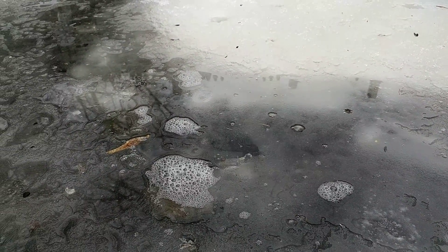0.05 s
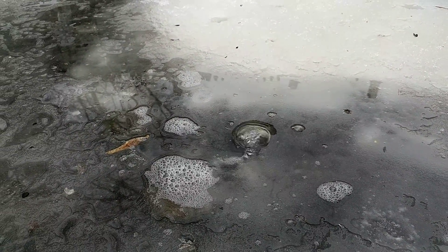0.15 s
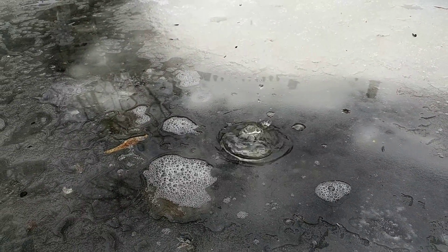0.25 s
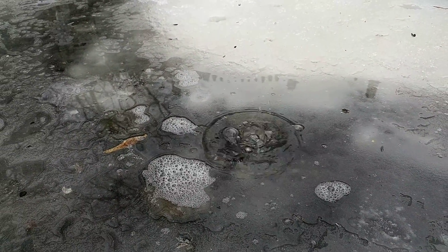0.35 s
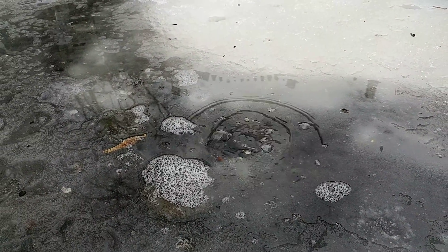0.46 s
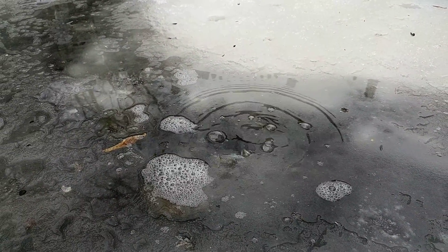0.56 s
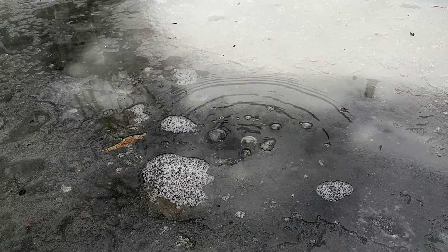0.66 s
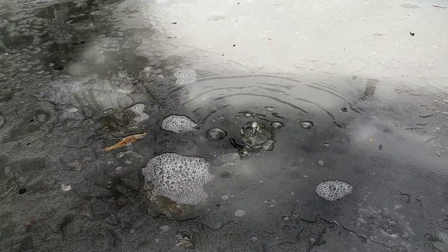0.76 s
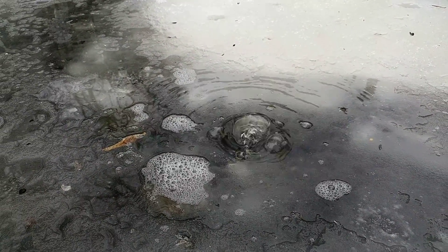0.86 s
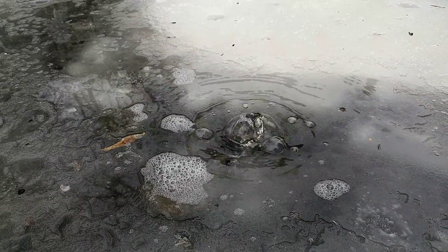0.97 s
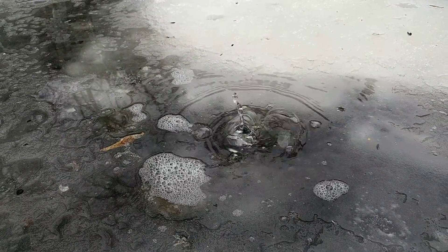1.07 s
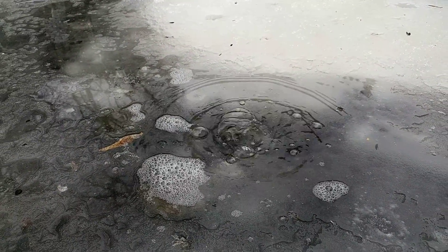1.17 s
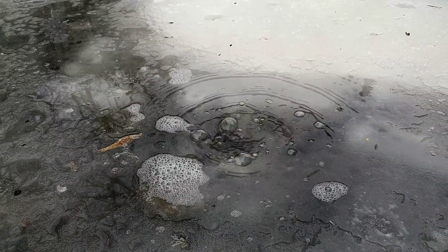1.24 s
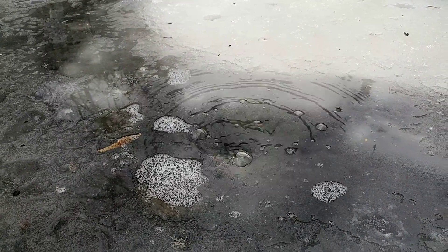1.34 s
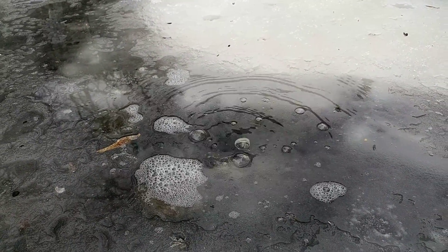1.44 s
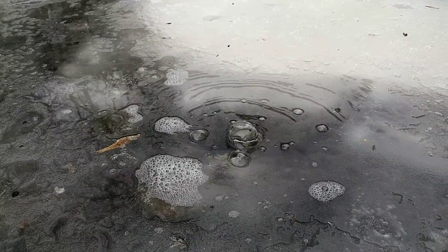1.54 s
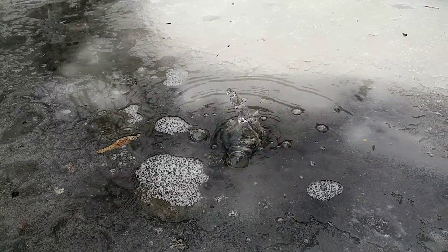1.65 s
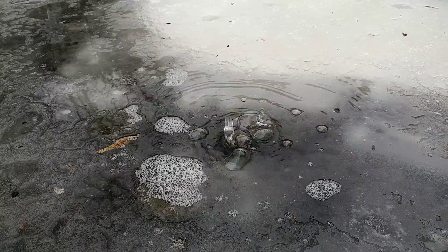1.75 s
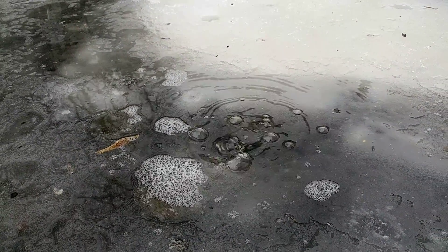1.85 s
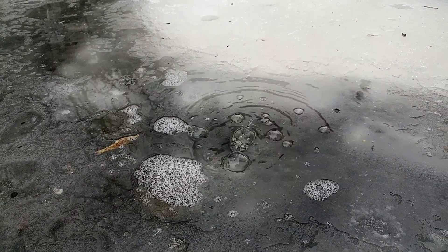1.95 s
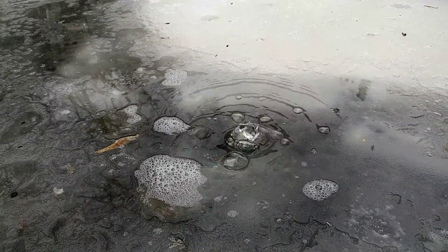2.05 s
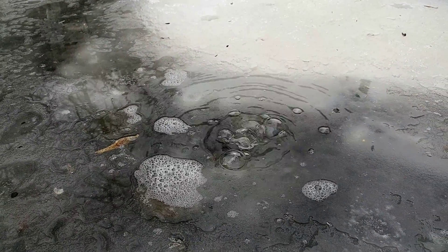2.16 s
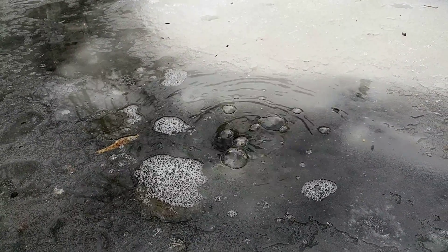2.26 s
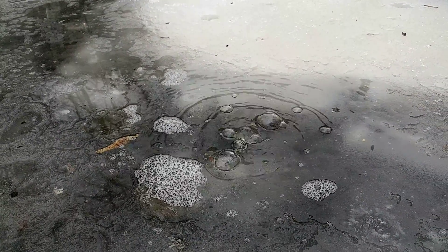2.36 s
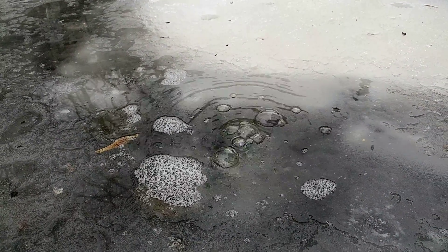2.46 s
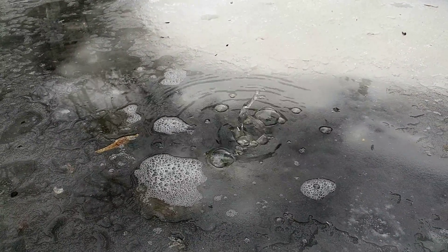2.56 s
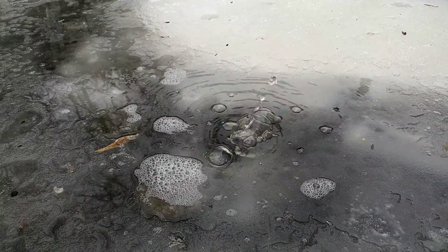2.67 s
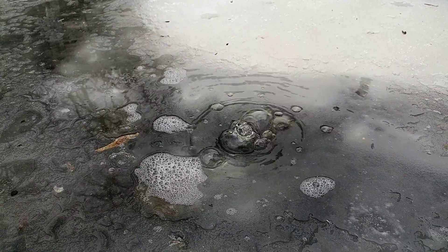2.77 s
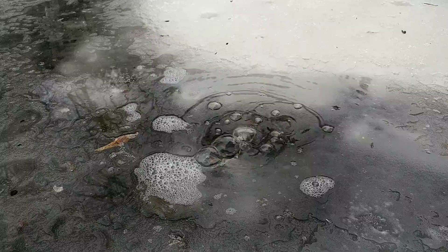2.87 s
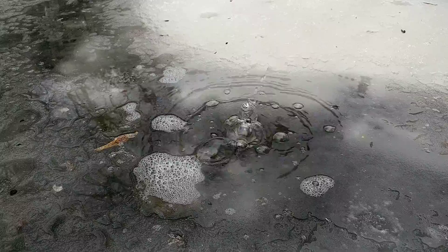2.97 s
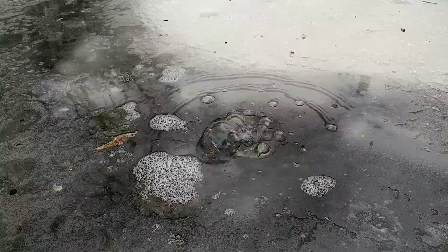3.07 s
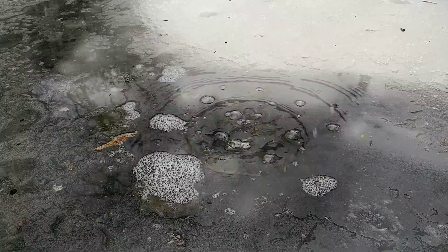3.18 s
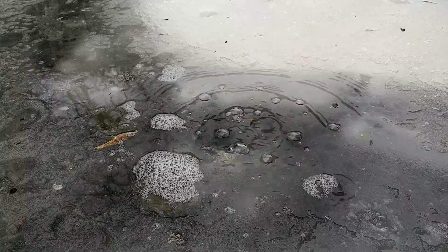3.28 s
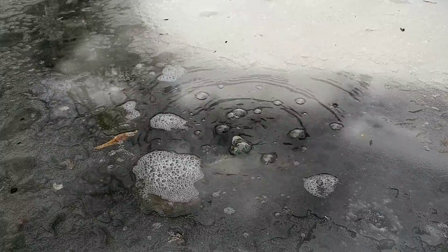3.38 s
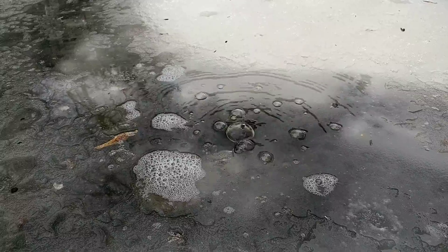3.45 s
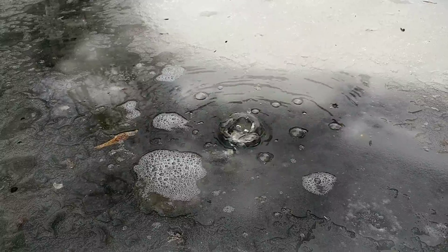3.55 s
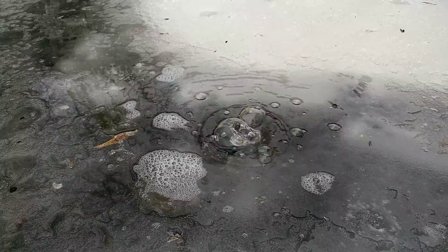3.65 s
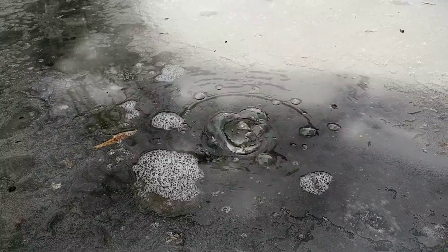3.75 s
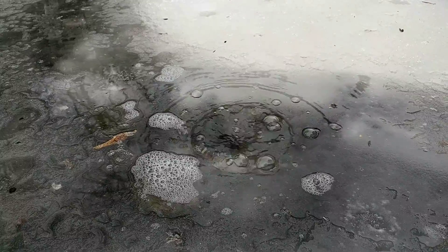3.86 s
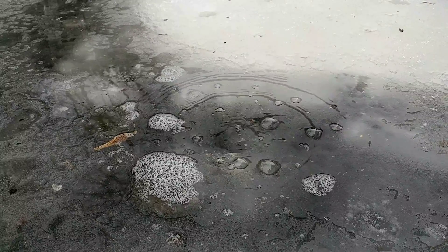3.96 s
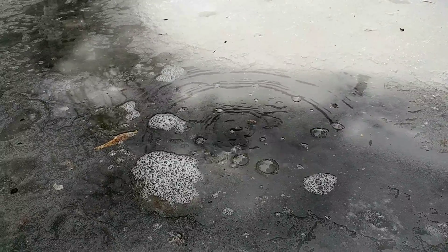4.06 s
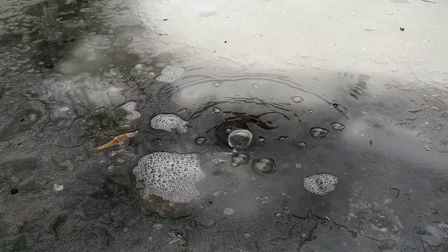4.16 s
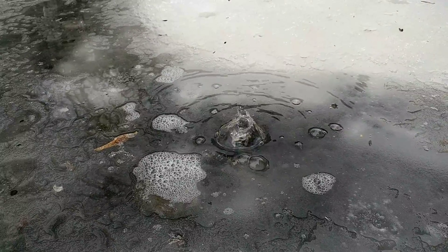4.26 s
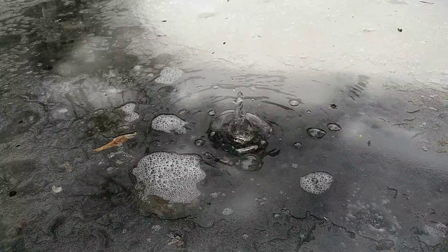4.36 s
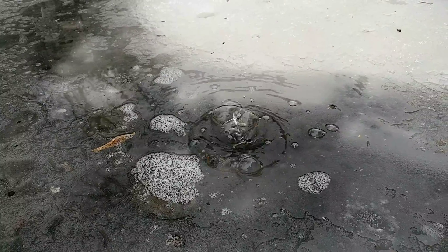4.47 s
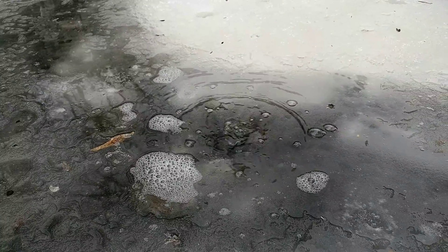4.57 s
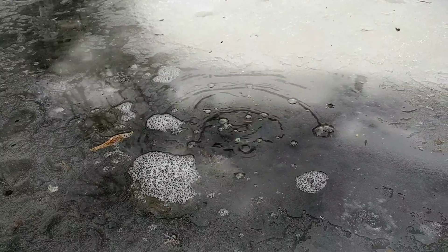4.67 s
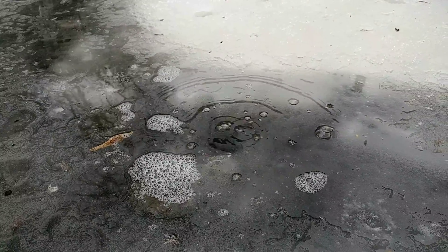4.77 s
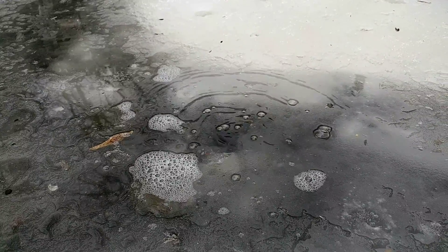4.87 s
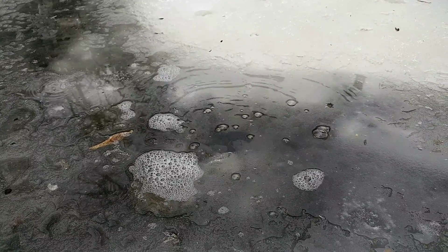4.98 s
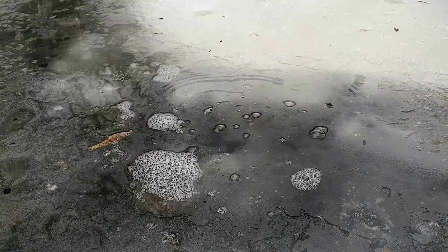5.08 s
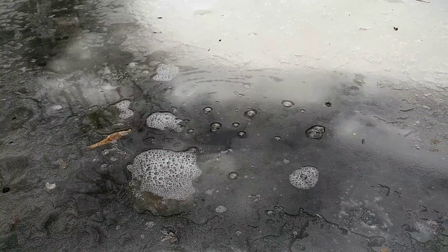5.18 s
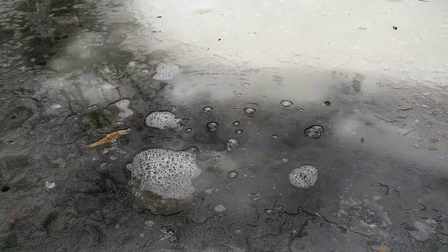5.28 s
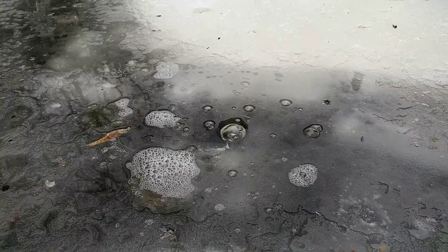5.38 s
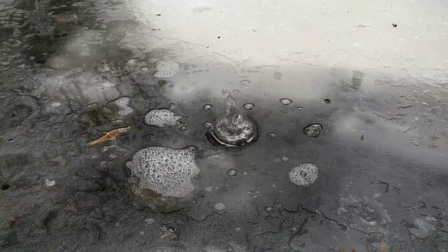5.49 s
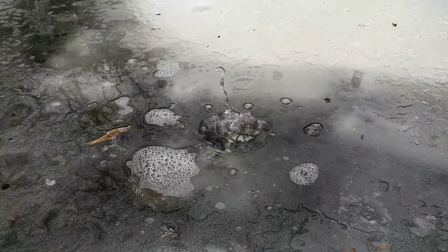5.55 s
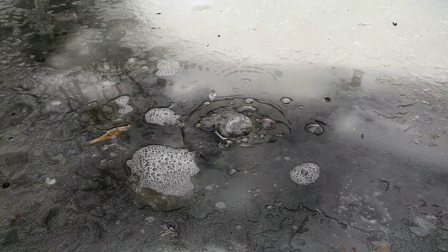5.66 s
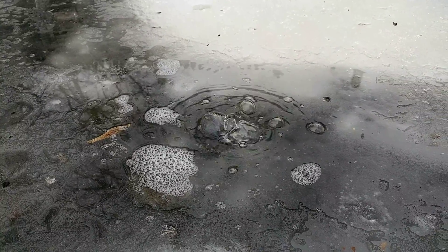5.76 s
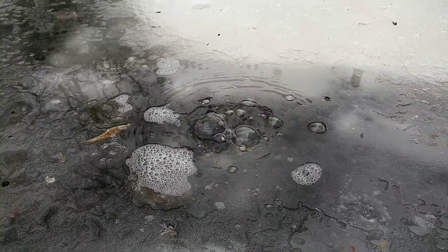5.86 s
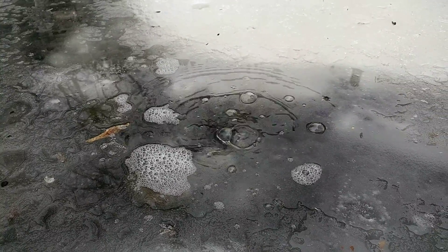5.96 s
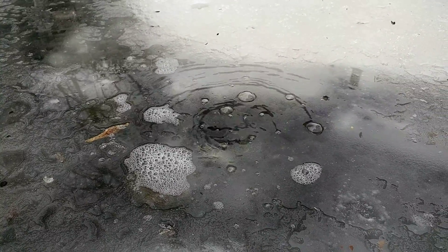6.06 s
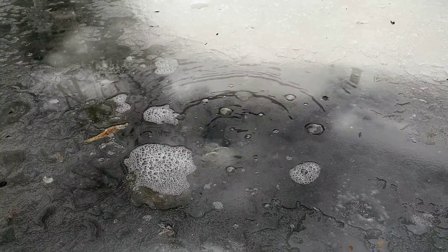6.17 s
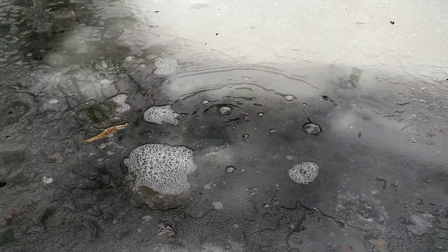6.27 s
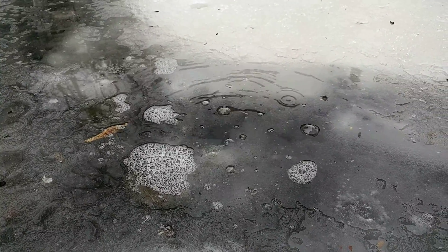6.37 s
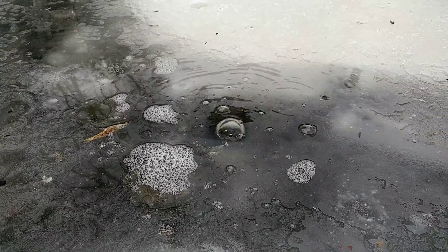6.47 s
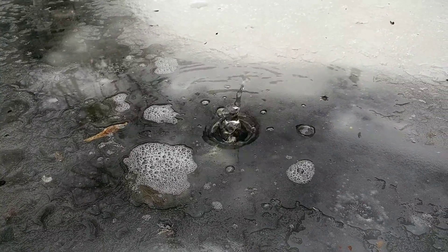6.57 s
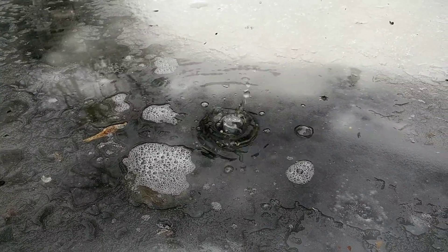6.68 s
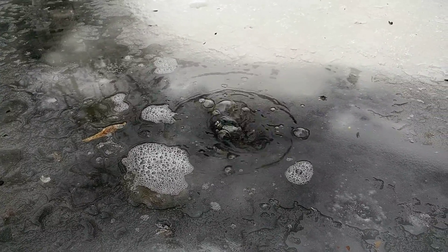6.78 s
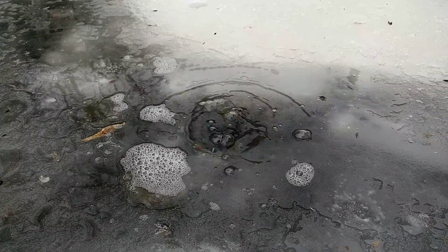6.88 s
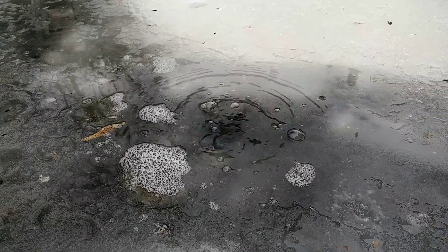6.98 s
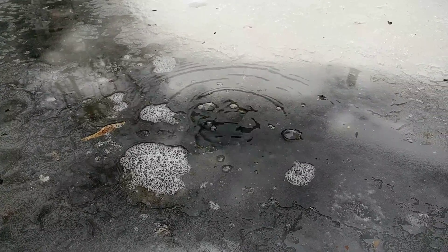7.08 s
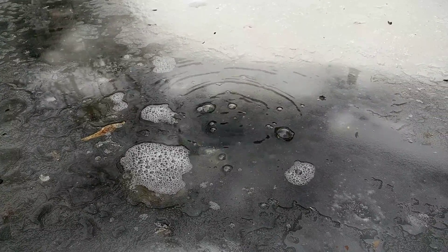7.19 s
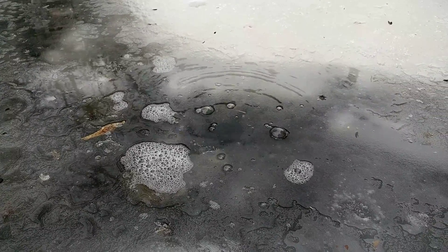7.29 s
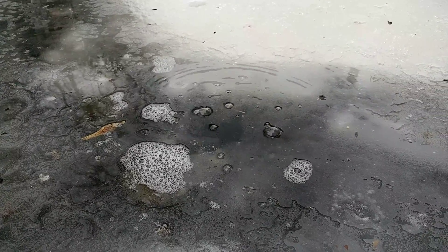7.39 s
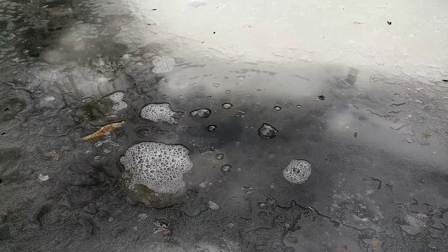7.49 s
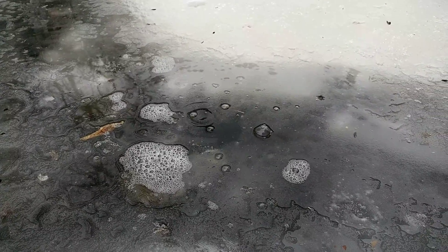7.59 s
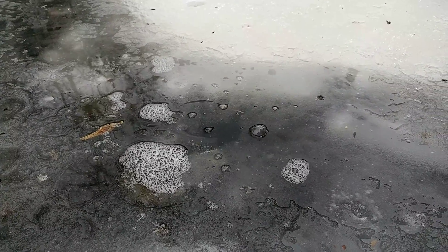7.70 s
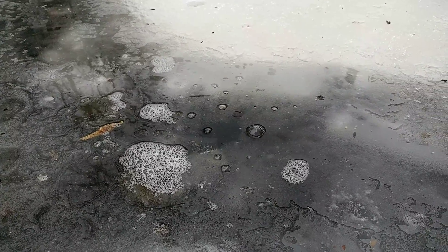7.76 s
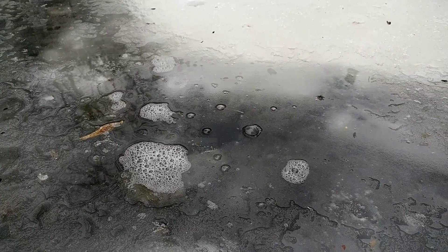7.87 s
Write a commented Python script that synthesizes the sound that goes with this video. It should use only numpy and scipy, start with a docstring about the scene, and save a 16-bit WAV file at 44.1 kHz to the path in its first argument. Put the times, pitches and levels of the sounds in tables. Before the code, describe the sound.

Close outdoor stereo of air bubbling up through an opening in thawing pond ice. Every half second to a second, a surge breaks into hollow gulps and plops that mostly glide upward, followed by bright droplet pings and ticking, fizzing foam. A quiet unsteady machine hum and soft open air sit underneath. After a pause around five seconds the bubbling returns, with thin distant bird calls; the last surge fades to foam and light bumps of breeze.

```python
"""Thawing pond: air from an aerator wells up through a hole in the ice, close to a two-port microphone.
Each upwelling heaves the water in a low note and breaks into gulps and plops, mostly climbing in pitch
as their cavities drain; pinging drops and foam that ticks and fizzes away are ringing films and hiss.
Around the hole: a machine's unsteady low lines, noise for the open air, thin whistles of far birds,
a short echo off the banks, and near the end a light breeze that bumps the ports."""
import sys
import numpy as np
from scipy import signal
from scipy.fft import rfft, irfft, next_fast_len
from scipy.io import wavfile
from scipy.ndimage import uniform_filter1d, map_coordinates

SR = 44100
rng = np.random.default_rng(int(sys.argv[2]) if len(sys.argv) > 2 else 0)


def write(x):
    x = np.atleast_2d(x).T
    wavfile.write(sys.argv[1], SR, np.round(np.clip(x, -1, 1) * 32767).astype(np.int16))


N = 349713  # samples

# Levels in the tables apply before the trims in the functions and the colour of the ports.


def amp(db):
    """Decibels to gain."""
    return 10 ** (np.asarray(db) / 20)


def unit(x):
    """Scale to rms 1."""
    return x / np.sqrt(np.mean(x ** 2) + 1e-20)


def along(points, hz):
    """Read (f/Hz, value) points on a log frequency axis."""
    f, v = np.transpose(points)
    return np.interp(np.log(hz + 1), np.log(f + 1), v)


def wobble(rate):
    """A smooth random curve through normal random knots, rate of them a second."""
    knots = rng.standard_normal(int(N * rate / SR) + 4)
    return map_coordinates(knots, [np.arange(N) * rate / SR])


def tone(hz):
    """A sine that follows a pitch curve."""
    return np.sin(2 * np.pi * np.cumsum(hz) / SR)


def filtered(x, response):
    """Shape x by a response of frequency, with padding against wrap-around."""
    m = next_fast_len(N + SR // 2)
    return irfft(rfft(x, m) * response(np.fft.rfftfreq(m, 1 / SR)), m)[..., :N]


def causal(gain):
    """The minimum-phase response with this gain: it rings only after its cause."""
    cepstrum = irfft(np.log(np.maximum(gain, 1e-6)))
    half = len(cepstrum) // 2
    fold = np.r_[1, np.full(half - 1, 2), 1, np.zeros(half - 1)]
    return np.exp(rfft(cepstrum * fold))


def coloured(x, points):
    """Filter x causally by (f/Hz, level/dB) points."""
    return filtered(x, lambda hz: causal(amp(along(points, hz))))


def noise(spectrum, alike):
    """Stereo noise of rms 1 with a given left-right likeness (1 = the same at both ports)."""
    turn = np.arccos(np.clip(alike, -1, 1)) / 2
    shaped = filtered(rng.standard_normal((2, N)), lambda hz: amp(along(spectrum, hz)))
    mid, side = shaped * [[np.cos(turn)], [np.sin(turn)]]
    return unit(np.array([mid + side, mid - side]))


def add(track, s, sound):
    """Mix a sound into a track at time s."""
    part = track[..., max(round(s * SR), 0):][..., :sound.shape[-1]]
    part += sound[..., :part.shape[-1]]


# Spectra of the open air, relative: f/Hz, level/dB
RUMBLE_SPECTRUM = [(22, -37.5), (35, -17.5), (52, -1), (75, 6.5), (108, 2.5), (132, -9), (182, -4.5),
                   (220, -15.5), (320, -15.5), (600, -86)]
AIR_SPECTRUM = [(140, -46.5), (230, -2), (296, -3.5), (390, -4), (427, -3.5), (518, 3.5), (562, 2.5),
                (674, -2.5), (1200, -14.5), (1860, -17), (2600, -23.5), (3380, -51.5), (5720, -120)]
HISS_SPECTRUM = [(1200, -38), (2500, -6), (4500, -7.5), (7000, -10), (10000, -10.5), (14000, -32.5),
                 (15000, -47.5)]


def outdoors(rumble_db=-45, air_db=-54, hiss_db=-68):
    """Distant rumble, a soft rush of air and a thin even hiss: three shaped noises, the first two drifting."""
    air_drift_db = .6 * wobble(2)
    rumble = amp(rumble_db + wobble(2.878)) * noise(RUMBLE_SPECTRUM, 0.973)
    air = amp(air_db + air_drift_db) * noise(AIR_SPECTRUM, 0.11)
    hiss = amp(hiss_db) * noise(HISS_SPECTRUM, .08)
    return rumble + air + hiss


# Lines of the machine: centre f/Hz, central level/dB rms, scale of the pitch waver f/Hz
HUM_LINES = [(61.43, -59, 0.717), (84.22, -48.5, 0.87), (102.23, -56.5, 1.2), (119, -63, 0.93),
             (178.66, -57.5, 3.213)]


def hum():
    """A running machine in the open air: a few low sines, each slightly unsteady in pitch and level."""
    lines = [amp(db + .8 * wobble(3.2)) * tone(hz + waver * wobble(5)) for hz, db, waver in HUM_LINES]
    return np.sqrt(2) * sum(lines)  # from rms to peak


# Far bird calls: t/s, length/s, start f/Hz, end f/Hz, rasp as a share of the pitch, peak level/dB
BIRD_CALLS = [(5.225, 0.068, 4527, 3553, 0.0316, -64), (5.616, 0.1123, 3385, 5070, 0.34, -54),
              (5.658, 0.131, 3983, 3745, 0.041, -58.5), (5.953, 0.048, 7100, 6800, 0.0049, -62.5),
              (6.45, 0.28, 3690, 3487, 0.011, -68), (6.604, 0.24, 7146, 6970, .005, -69),
              (6.652, 0.19, 3692, 3648, .012, -67.5)]


def birds():
    """Thin far whistles and one raspy call, wavering in level on their way through the air."""
    out = np.zeros(N)
    for s, length, start_hz, end_hz, rasp, db in BIRD_CALLS:
        n = int(length * SR)
        pitch = np.geomspace(start_hz, end_hz, n) * (1 + rasp * wobble(1500)[:n])
        add(out, s, amp(db) * signal.windows.tukey(n) * tone(pitch))
    wavering = amp(3.5 * wobble(35) - 3)
    return out * wavering * amp([[-4], [0]])  # left, right


# Decay of the echo: f/Hz, time to fall 60 dB t/s
YARD_DECAY = [(200, 0.255), (1000, 0.2346), (4000, 0.052), (12000, 0.058)]


def yard(x):
    """A faint, short answer from banks and ice: decaying noise, its decay set by frequency."""
    hz, t, z = signal.stft(rng.standard_normal((2, SR // 2)), SR, nperseg=256)
    decay = amp(-60 * t / along(YARD_DECAY, hz)[:, None])
    tail = signal.istft(z * decay, SR, nperseg=256)[1]
    tail = tail + np.mean(tail, axis=0)  # the ports are close together and hear much the same
    return signal.fftconvolve(x, tail / np.linalg.norm(tail[0]), axes=1)[:, :N]


# Puffs of breeze: centre t/s, length between the 1/e points/s, level/dB
BREEZE_PUFFS = [(6.538, 0.085, -33.5), (6.923, 0.044, -37.5), (7.095, 0.0268, -22)]
# Spectrum of air buffeting the ports, relative: f/Hz, level/dB
BUFFET_SPECTRUM = [(24, -37.5), (45, -2), (62, 1), (110, -6.5), (200, -25), (500, -61.5)]


def breeze():
    """Short puffs thump the ports with low noise, mostly the right one."""
    t = np.arange(N) / SR
    level = sum(amp(db) * np.exp(-(2 * (t - s) / length) ** 2) for s, length, db in BREEZE_PUFFS)
    return level * noise(BUFFET_SPECTRUM, 0.13) * amp([[-8], [2]])


# Surges of air reaching the surface: t/s, heave f/Hz, heave level/dB, fresh foam level/dB
# (played by foam, spray and heaves)
SURGES = [(.331, 194.7, -23.5, -57), (1.07, 136.3, -31.5, -56), (1.725, 164.9, -24.5, -54),
          (2.68, 119.6, -40, -61), (3.07, 121, -29.5, -60), (3.83, 146.8, -39, -62),
          (4.435, 123.4, -23, -61), (5.76, 138.3, -38, -57), (6.70, 151, -46, -59)]


def foam(rise_s=0.078, fade_db_per_s=11, old_foam_db=-70):
    """Level of the foam: each upwelling adds a patch that builds quickly and slowly bursts away."""
    power = np.full(N, amp(old_foam_db) ** 2)  # a little always lingers
    for s, _, _, db in SURGES:
        age = np.maximum(np.arange(N) / SR - s, 0)
        patch = amp(db - fade_db_per_s * age) * (1 - np.exp(-age / rise_s))
        power += patch ** 2
    return np.sqrt(power)


def tiny_bubble(hz, t60, snap, glide):
    """A film snaps and the air under it rings briefly, with another phase at each port."""
    t = np.arange(SR // 25) / SR
    phase = 2 * np.pi * hz * (t + glide * t * np.minimum(t / t60, 1))
    port_phase = np.array([[0], [rng.normal(-1.35, 1)]])  # rad
    ring = np.sin(phase + port_phase) * amp(-60 * t / t60) * (1 - np.exp(-t / 8e-5))
    crack = rng.standard_normal((2, len(t))) * amp(-60 * t / .005)
    return ring + snap * crack


def fizz(gain_db=-5.0, spread_db=4.5, mist_db=-7, ring_cycles=38, count=2000):
    """Many foam bubbles burst at random, louder and more often after each upwelling."""
    level = foam()
    times = np.searchsorted(np.cumsum(level) / level.sum(), rng.random(count)) / SR
    pitches = np.clip(7400 * np.exp(0.372 * rng.standard_normal(count)), 2900, 13500)
    sizes = amp(spread_db * np.minimum(rng.exponential(size=count), 3.5))
    out = np.zeros((2, N))
    for start, hz, size in zip(times, pitches, sizes):
        add(out, start, size * tiny_bubble(hz, ring_cycles / hz, snap=0.3, glide=0.05))
    ticks = amp(gain_db) * np.sqrt(np.mean(level ** 2)) * unit(out * np.sqrt(level))
    # the finest bubbles merge into a soft, uneven hiss; spectrum: f/Hz, level/dB
    mist_spectrum = [(1500, -24.5), (3200, 15), (5500, 7.5), (8000, -22.0), (11000, -9.0), (15000, 11.5)]
    mist = amp(mist_db + 2.1 * wobble(25)) * level * noise(mist_spectrum, 0.18)
    return ticks + mist


# Louder droplets and bursting bubbles: t/s, ring level/dB, ring f/Hz, film snap against the ring level/dB
LOUD_POPS = [(0.3648, -34, 3910, -7), (0.4402, -42, 5110, 4.5), (0.4652, -42, 3654, 2),
             (0.4947, -35, 5786, 2), (0.6695, -46, 3436, -3.5), (0.7953, -33.5, 11140, -1.5),
             (0.8566, -40.5, 10760, -6.5), (0.9116, -38.5, 10700, -5.5), (1.0675, -35, 2815, -11),
             (1.0674, -31, 7910, -3), (1.074, -39.5, 7670, 1.5), (1.2605, -42.5, 5500, -1.5),
             (1.272, -38.5, 7340, 4), (1.3419, -41.5, 10190, 1.5), (1.3838, -41.5, 13500, -14),
             (1.6855, -39.5, 6050, -1.5), (1.7859, -30, 3580, -15), (1.8852, -40, 5007, -15),
             (1.9449, -38.5, 7880, -1.5), (1.9622, -27, 10610, -3), (2.2612, -23.5, 8670, -11.5),
             (2.3472, -38, 11330, -0.5), (2.5697, -41.5, 10720, -2), (2.6808, -39.5, 4011, -2.5),
             (2.8469, -35.5, 10890, -2.5), (2.9219, -40.5, 6550, -3), (2.981, -41, 8200, 0),
             (3.0016, -40.5, 3580, -10), (3.1168, -32, 7700, -3.5), (3.2484, -40, 7680, 0.5),
             (3.2772, -39, 7410, 1.5), (3.3077, -41.5, 5216, -3.5), (3.5078, -39.5, 10110, -3),
             (3.6735, -40, 5860, -2), (3.9792, -43, 10000, -6), (4.0154, -27.5, 5370, -6),
             (4.2292, -43.5, 10380, -4.5), (4.6862, -44.5, 3550, 1.5), (4.7084, -41, 8230, -1.5),
             (5.3732, -40.5, 7420, -8), (5.7549, -39, 11000, -6.5), (5.891, -42.5, 5140, -1),
             (5.9504, -42.5, 7440, 4.5), (6.0728, -34.5, 7530, -3), (6.1402, -35.5, 11250, -8),
             (6.1564, -43, 5800, -10.5), (6.1669, -33.5, 6445, -6.5), (6.354, -30.5, 7850, -9.5),
             (6.5067, -41.5, 11100, -3), (6.7485, -36, 7290, 1.5), (6.9145, -55, 7310, 4.5),
             (7.0872, -44.5, 3880, -4.5), (7.108, -46.5, 5640, -4.5), (7.1277, -40.5, 4910, 0.5),
             (7.3574, -40, 11400, -7)]


def pops(gain_db=2.0, ring_cycles=60):
    """The louder droplets and bursting foam bubbles; those of higher pitch ring shorter."""
    out = np.zeros((2, N))
    for s, db, hz, snap_db in LOUD_POPS:
        add(out, s, amp(db + gain_db) * tiny_bubble(hz, ring_cycles / hz, amp(snap_db), glide=0.0584))
    # f/Hz, level/dB
    return coloured(out, [(800, -23), (2800, 0.0), (5500, 4), (8000, -3), (11000, -4), (15000, -2)])


def spray(over_foam_db=11, delay_s=.02, scatter_s=0.051, pitch_hz=3900, ring_s=0.0065, count=6):
    """Each upwelling throws a few drops that ping as they fall back."""
    out = np.zeros((2, N))
    for s, _, _, foam_db in SURGES:
        for wait, pitch, size in rng.standard_normal((count, 3)):
            ping = tiny_bubble(pitch_hz * np.exp(.22 * pitch), ring_s, snap=.15, glide=.06)
            level = amp(foam_db + over_foam_db + 3 * size)
            add(out, s + delay_s + scatter_s * abs(wait), level * ping)
    return out


def heaves(half_s=0.01829):
    """Each upwelling lifts the water with a short, low, slightly rising note."""
    t = np.arange(int(6 * half_s * SR)) / SR - 3 * half_s
    out = np.zeros(N)
    for s, hz, db, _ in SURGES:
        add(out, s + t[0], amp(db) * np.exp(-(t / half_s) ** 2) * tone(hz * np.exp(7 * t)))
    return out


def gulp(swell, peak_hz, climb, rest=.27, attack=0.00207, swell_db_per_octave=15,
         fade_db_per_octave=22, fade_bend=1.3, closes_at=0.6385, closing=0.305):
    """A draining cavity climbs ever faster from a low note, swells as its mouth widens, dies as it flattens."""
    t = np.arange(int((swell + 1.1 / climb) * SR)) / SR
    # octaves above the pitch of the loudest moment; rest is the resting note as a share of that pitch
    octave = np.log2(rest + (1 - rest) * 2 ** (climb * (t - swell) / (1 - rest)))
    swell_db = -swell_db_per_octave * np.maximum(-octave, 0)
    fade_db = -fade_db_per_octave * np.maximum(octave, 0) ** fade_bend
    closure = np.exp(-(np.maximum(octave - closes_at, 0) / closing) ** 2)
    mouth = (1 - np.exp(-t / attack)) * closure
    return amp(swell_db + fade_db) * mouth * tone(peak_hz * 2 ** octave)


def plop(length, start_hz, climb, attack=.0012, fade_db=19, fade_bend=1.4, climb_bend=1.2,
         closing=0.214, snap_db=-33, snap_s=.0035):
    """The film snaps and the cavity rings at once, gliding and fading until it closes."""
    t = np.arange(int(1.6 * length * SR)) / SR
    drained = t / length
    closure = np.exp(-(np.maximum(drained - 1, 0) / closing) ** 2)
    mouth = (1 - np.exp(-(t / attack) ** 2)) * closure
    note = tone(start_hz * 2 ** (climb * drained ** climb_bend))
    ring = mouth * amp(-fade_db * drained ** fade_bend) * note
    return ring + amp(snap_db) * np.exp(-t / snap_s) * rng.standard_normal(len(t))


# Cavities that open gradually: t/s, swell time/s, f/Hz at the loudest moment,
# climb at that moment/(octaves per s), peak level/dB
SLOW_CAVITIES = [(0.3635, 0.1028, 500, 15.1, -38), (0.8158, 0.1055, 765.8, 26.4, -23.5),
                 (1.029, 0.0435, 628.9, 34.7, -9.5), (1.1828, 0.0553, 575.2, 23.1, -21.5),
                 (1.5868, 0.103, 667.4, 23.8, -19.5), (1.7235, 0.0187, 610, 21.7, -16.0),
                 (1.7837, 0.0933, 649, 23, -39), (2.1069, 0.0419, 522, 26.4, -19.5),
                 (2.1404, 0.0919, 697.6, 15.5, -30.5), (2.2547, 0.0366, 515, 20.5, -25),
                 (2.4336, 0.0409, 568.2, 19.7, -31), (2.6584, 0.031, 741.5, 31.1, -17.5),
                 (2.8265, 0.0456, 581.9, 33.2, -19), (3.5618, 0.0884, 562.1, 35.7, -24.5),
                 (3.7917, 0.0452, 494.3, 25.9, -11), (4.4147, 0.01171, 532.5, 35.9, -7.5),
                 (4.4655, 0.02, 454.9, 19.9, -19), (5.5613, 0.062, 713.5, 24.9, -25),
                 (5.8488, 0.0176, 774.7, 33.6, -19), (6.6586, 0.0326, 444, 40.7, -11),
                 (6.8123, 0.0539, 672.7, 35.8, -19.5)]
# Cavities that burst open at once: t/s, length/s, start f/Hz, climb/octaves (negative falls), level/dB
BURST_CAVITIES = [(0.217, 0.04003, 457.5, 0.605, -36), (0.2864, 0.00549, 463, 0.22, -19.5),
                  (0.3163, 0.02057, 432.8, 0.8, -15), (0.3309, 0.0165, 517.8, 0.54, -11.5),
                  (0.3521, 0.00859, 394.5, 1.165, -11), (0.3594, 0.005522, 658.2, 0.48, -8.5),
                  (0.3636, 0.0176, 693.5, 0.52, -3), (0.364, 0.0093, 1488, 0.028, -25.5),
                  (1.013, 0.011, 1864, -0.054, -39.5), (1.0315, 0.0039, 643, 0.98, -25),
                  (1.11, 0.0035, 480, 1.25, -11), (1.1286, 0.0353, 539, 0.973, -14.5),
                  (1.7073, 0.0244, 412.3, 1.384, -18), (1.7487, 0.0065, 619.7, -0.06, -11),
                  (1.7762, 0.0237, 548.2, 0.8, -14), (1.7852, 0.0046, 988.6, -0.74, 1.0),
                  (1.789, 0.021, 1093, 0.656, -23), (1.82, 0.0176, 330, -0.027, -30.5),
                  (1.9051, 0.0135, 1282, 0.31, -29.5), (2.0772, 0.0134, 519.7, 0.1, -30.5),
                  (2.106, 0.015, 330.9, 0.34, -28.5), (2.2184, 0.0295, 645.9, 0.31, -28),
                  (2.437, 0.031, 646.5, 1.17, -34), (2.641, 0.026, 953, 1.01, -33.5),
                  (2.683, 0.013, 690.2, -0.277, -7.0), (2.691, 0.022, 877.1, 0.424, -21),
                  (2.8136, 0.00981, 295.3, 0.1, -23), (2.8639, 0.0201, 503, 0.67, -18.5),
                  (2.934, 0.0134, 410, 0.37, -30), (2.954, 0.014, 327.5, 0.26, -31),
                  (3.0397, 0.00956, 234, 1.59, -22), (3.0703, 0.0253, 399.5, 1.373, -12),
                  (3.0804, 0.0119, 579.1, 0.72, -8.5), (3.0899, 0.01744, 473, 0.616, -15.5),
                  (3.1129, 0.0059, 824, 1.095, -11), (3.1134, 0.04596, 361.7, -0.04, -23),
                  (3.1222, 0.0548, 574, 0.883, -11.5), (3.7396, 0.0078, 536, 0.27, -28.5),
                  (3.7973, 0.0028, 452.7, 1.255, -20), (3.8398, 0.0332, 516.1, 0.366, -12.5),
                  (3.8541, 0.0132, 1271, 0.485, -32), (4.257, 0.01399, 353.3, -0.26, -35),
                  (4.34, 0.0354, 480.3, 0.35, -32.5), (4.3699, 0.00768, 445, 0.265, -22.5),
                  (4.3921, 0.01112, 328.5, 0.44, -19), (4.4053, 0.0123, 460.2, 0.38, -16.5),
                  (4.4567, 0.0272, 962.7, 0.47, -22), (4.55, 0.006325, 1100, 0.0052, -31),
                  (5.5225, 0.005914, 583, -0.11, -25), (5.629, 0.016, 860.2, 0.031, -17),
                  (5.6409, 0.0313, 610, 0.72, -20), (5.7343, 0.00568, 448, 0.93, -8.5),
                  (5.7429, 0.0237, 605, 0.884, -10.0), (5.781, 0.0515, 318, 1.04, -33),
                  (5.8104, 0.00953, 460, 1.33, -24), (5.8423, 0.0099, 504.8, 0.74, -10.5),
                  (5.8688, 0.0677, 425, 0.68, -20.0), (5.8689, 0.00711, 886.7, -0.015, -12.5),
                  (5.8917, 0.0342, 732.3, 0.646, -20), (6.104, 0.0194, 904.3, -0.31, -27),
                  (6.663, 0.00726, 602, -0.24, -22.5), (6.67, 0.0316, 736.5, 0.24, -23),
                  (6.7007, 0.0115, 771, 0.884, -13.5), (6.7151, 0.0096, 1203, 0.34, -17.5),
                  (6.7116, 0.0415, 867.5, 0.62, -12), (6.8156, 0.0287, 734, 0.74, -29.5)]


def big_bubbles(gulp_db=0.3346, plop_db=0.89):
    """All gulps and plops; the moving water makes their pitch and strength tremble."""
    out = np.zeros(N)
    for s, swell, hz, climb, db in SLOW_CAVITIES:
        add(out, s, amp(db + gulp_db) * gulp(swell, hz, climb))
    for s, length, hz, climb, db in BURST_CAVITIES:
        add(out, s, amp(db + plop_db) * plop(length, hz, climb))
    sway = 6e-5 * SR * wobble(130)  # shift of the reading point in samples
    tremble = amp(1.2 * wobble(230))
    return map_coordinates(out, [np.arange(N) + sway]) * tremble


def gurgle(big, plop_db=-15, churn_db=-22, plop_cycles=7, size_spread_db=3, count=380):
    """Around each big bubble the water churns and sheds many small, short plops."""
    power = uniform_filter1d(uniform_filter1d(big ** 2, SR // 14), SR // 25)
    stir = np.sqrt(np.abs(power))
    stir = np.roll(stir, -round(0.013 * SR))  # the water is roughest as the bubble breaks through
    chance = np.abs(uniform_filter1d(stir, SR // 10)) ** .7
    times = np.minimum(np.searchsorted(np.cumsum(chance) / chance.sum(), rng.random(count)), N - 1)
    plops = np.zeros(N)
    for i, (pitch, life, size) in zip(times, np.clip(rng.standard_normal((count, 3)), -2, 2)):
        hz = 500 * np.exp(.45 * pitch)
        length = plop_cycles / hz * np.exp(0.08 * life)
        level = amp(plop_db + size_spread_db * size) * stir[i]
        add(plops, i / SR, level * plop(length, hz, climb=0.341, snap_db=-37))
    # f/Hz, level/dB
    churn_spectrum = [(60, -14), (120, 12.0), (190, -4.0), (300, -19.5), (900, -27), (1600, -30), (3000, -26)]
    churn = stir * noise(churn_spectrum, 0.655)[0]
    return plops + amp(churn_db) * churn


def hole():
    """The bubbling opening lies slightly towards the left port; water rounds off its sharpest edges."""
    big = big_bubbles()
    radiated = [(20, -33), (90, -0.5), (1600, -2.5), (3000, -11), (8000, -18.5)]  # f/Hz, level/dB
    water = coloured(big + heaves() + gurgle(big), radiated)
    right_lag = 4.2e-5  # s
    late = filtered(water, lambda hz: np.exp(-2j * np.pi * hz * right_lag))
    return np.array([amp(-0.56) * water, amp(-1.4447) * late])


def scene():
    """The bubbling hole in its surroundings."""
    low, high, far = hole(), pops() + fizz() + spray(), birds()
    echo = yard(amp(-26) * low + amp(-0.5) * high + amp(2.5) * far)
    return low + high + amp(2.0) * far + echo + hum() + outdoors() + breeze()


# Colour of the two microphone ports: f/Hz, level/dB
LEFT_COLOUR = [(2000, 2.5), (4500, -3), (6700, -3.5), (8300, -2), (8900, -3.5), (9600, 3.5), (10600, 14),
               (12200, 7), (15500, -7)]
RIGHT_COLOUR = [(2000, 3), (4500, -2), (6700, 4), (7700, 11), (8400, 8), (8900, -23), (9500, -3),
                (12200, 2), (15500, -12)]


def record(dry, top_hz=16000, bass_hz=30, ceiling=.96):
    """Each port colours the sound its own way; the sharpest peaks are rounded; deep bass and top are cut."""
    ports = np.array([coloured(x, port) for x, port in zip(dry, (LEFT_COLOUR, RIGHT_COLOUR))])
    rounded = ports / (1 + np.abs(ports / ceiling) ** 12) ** (1 / 12)
    return filtered(rounded, lambda hz: (hz < top_hz) * hz ** 4 / (hz ** 4 + bass_hz ** 4))


dry = scene()
out = record(dry)
write(out)
```